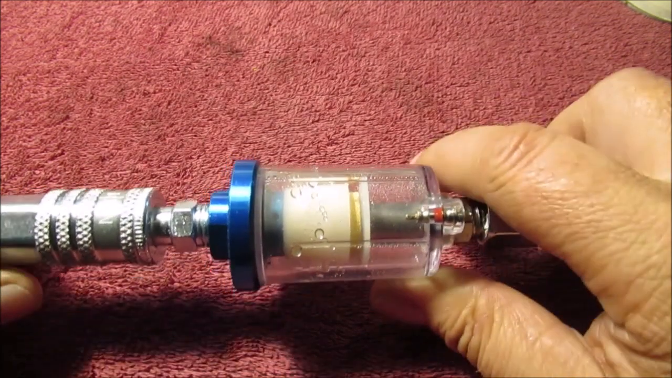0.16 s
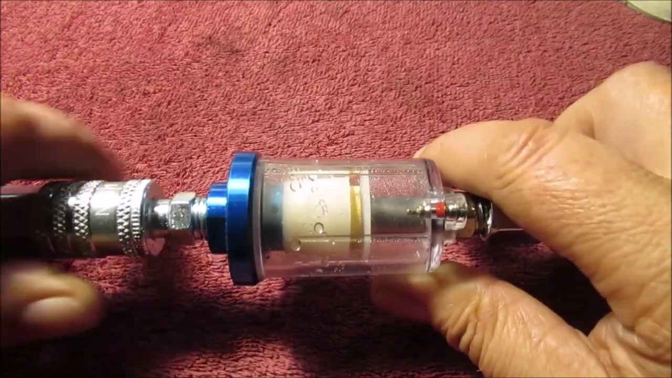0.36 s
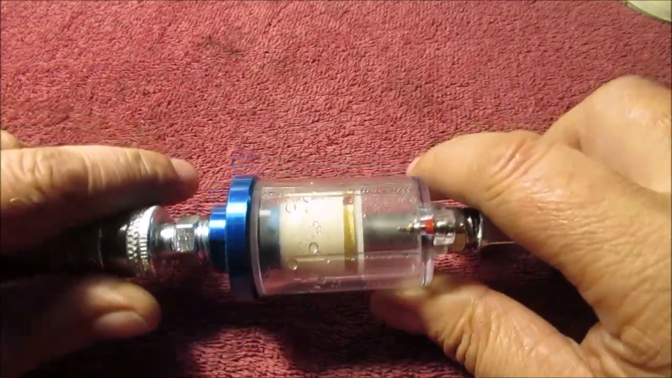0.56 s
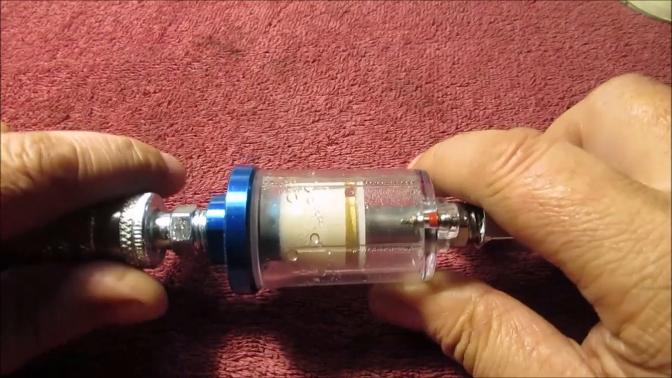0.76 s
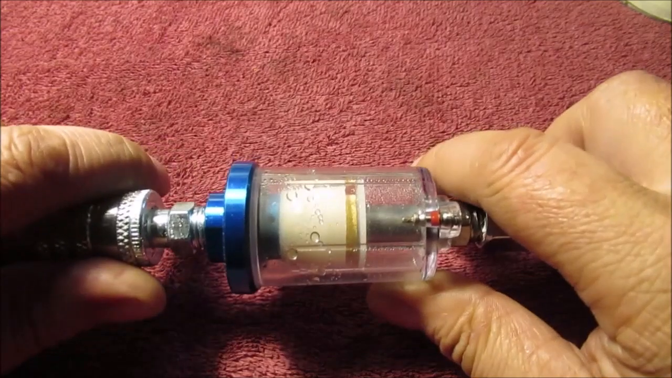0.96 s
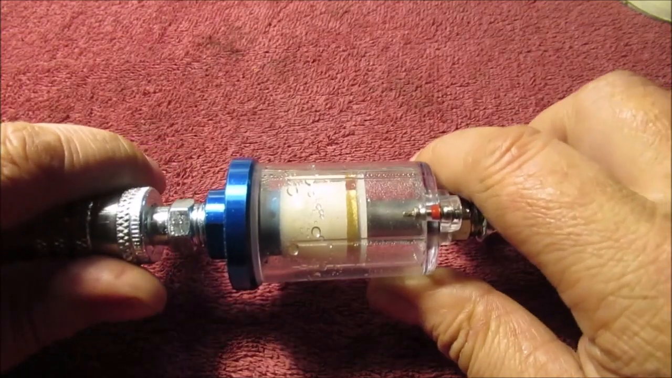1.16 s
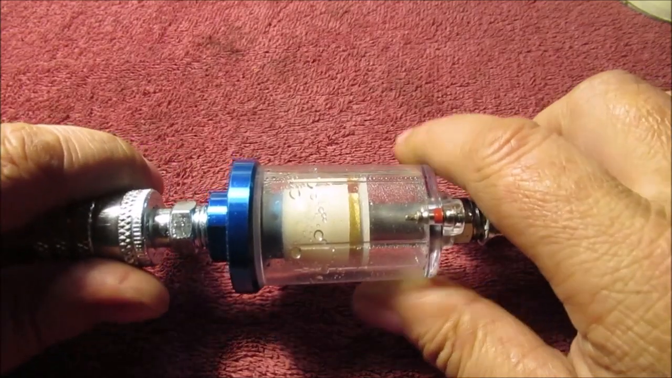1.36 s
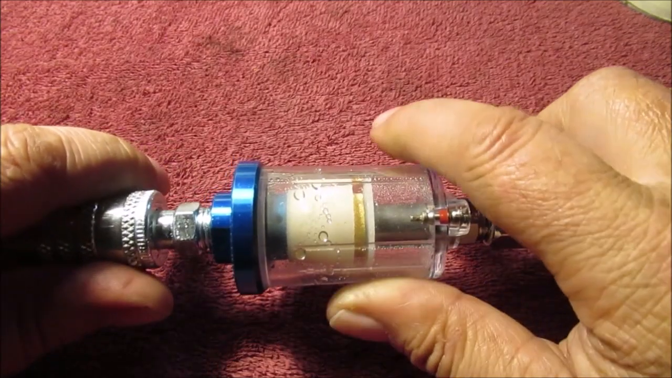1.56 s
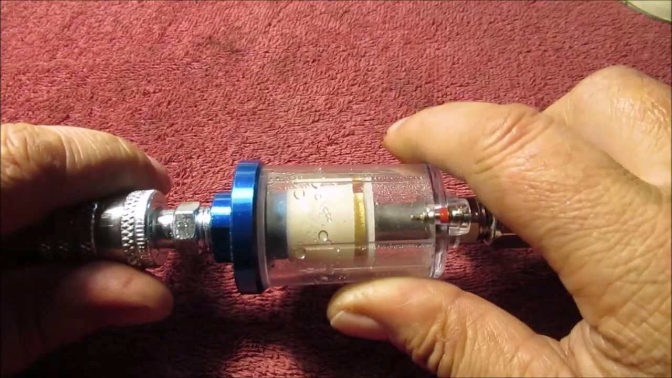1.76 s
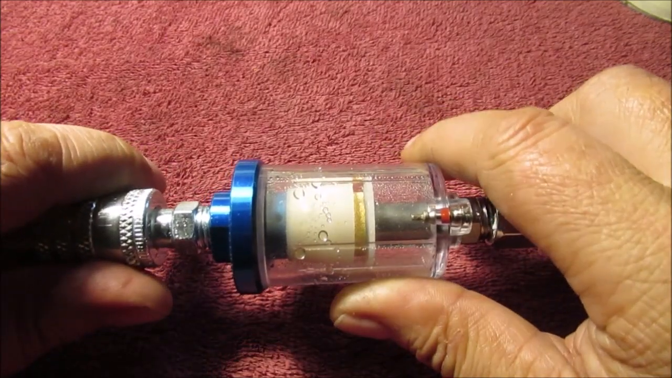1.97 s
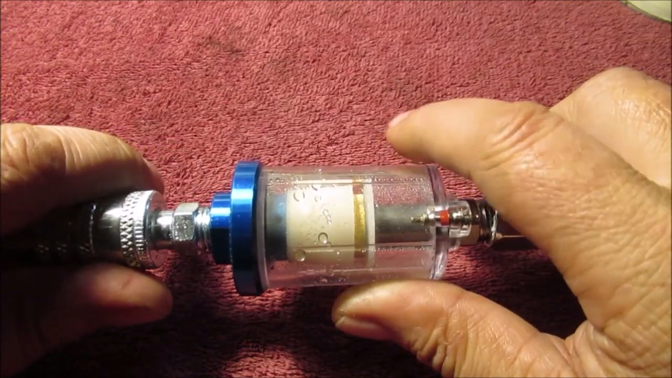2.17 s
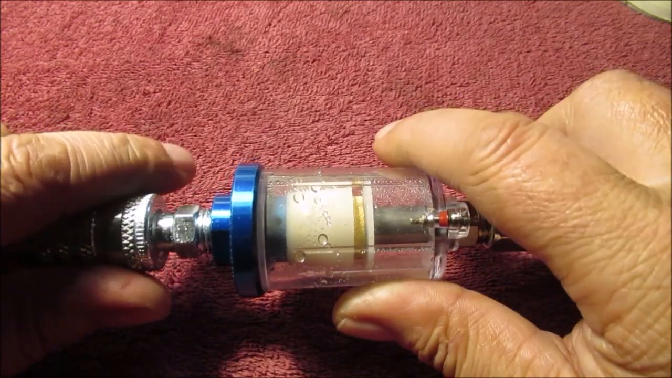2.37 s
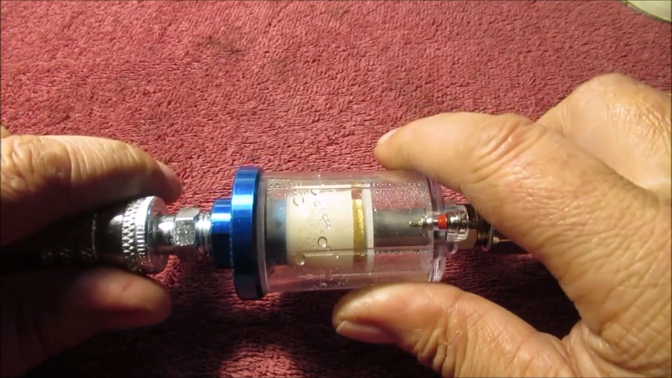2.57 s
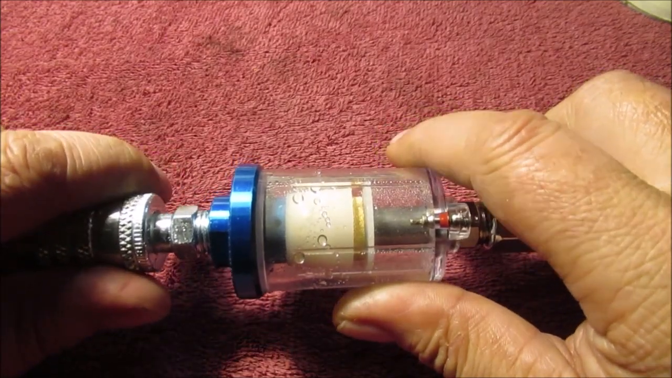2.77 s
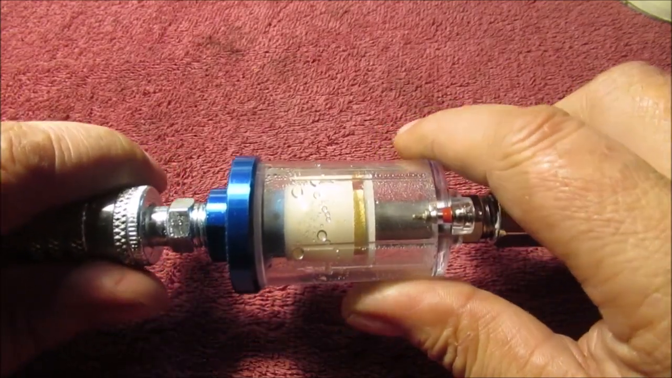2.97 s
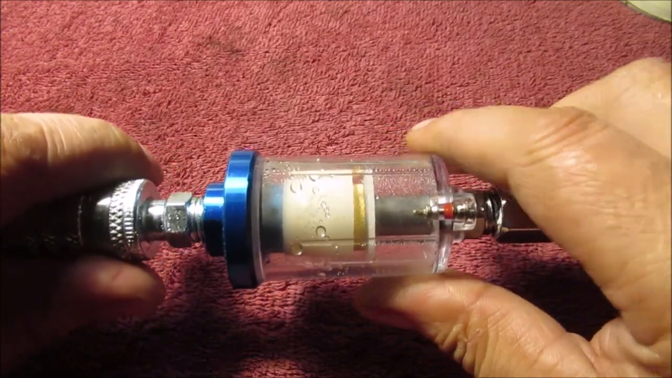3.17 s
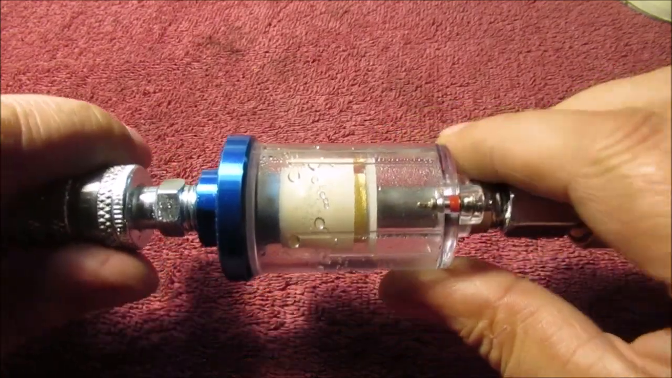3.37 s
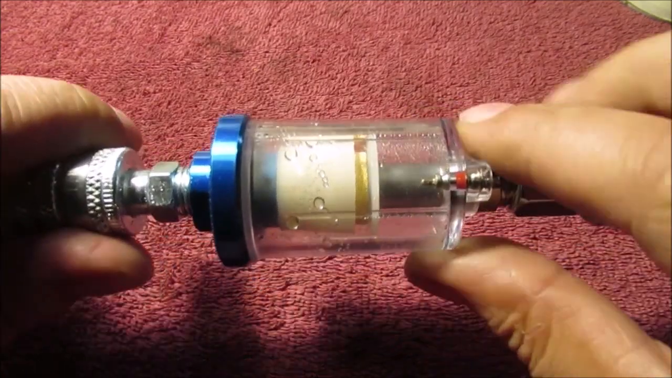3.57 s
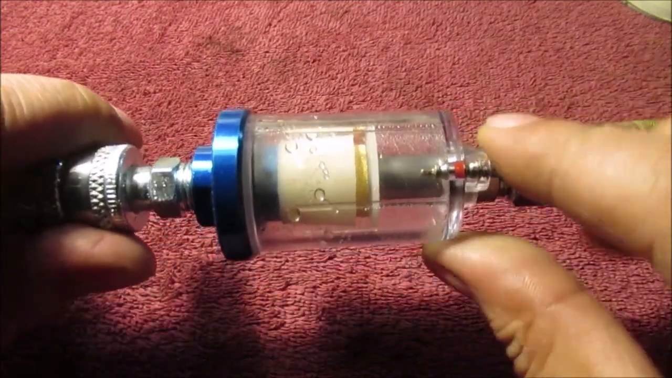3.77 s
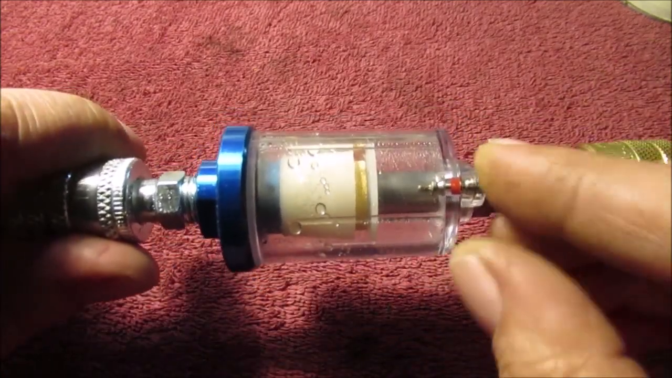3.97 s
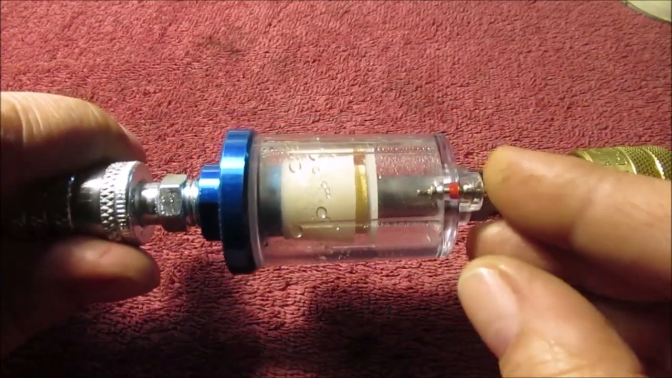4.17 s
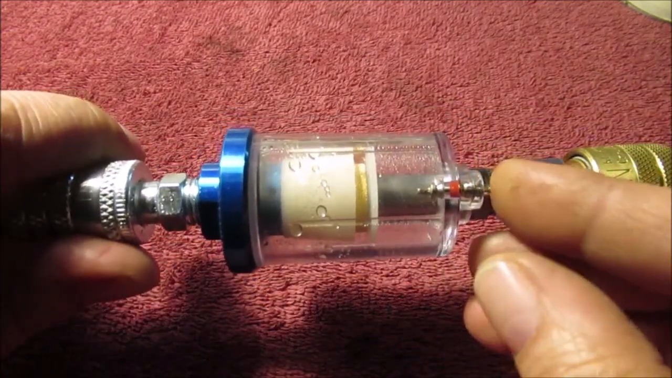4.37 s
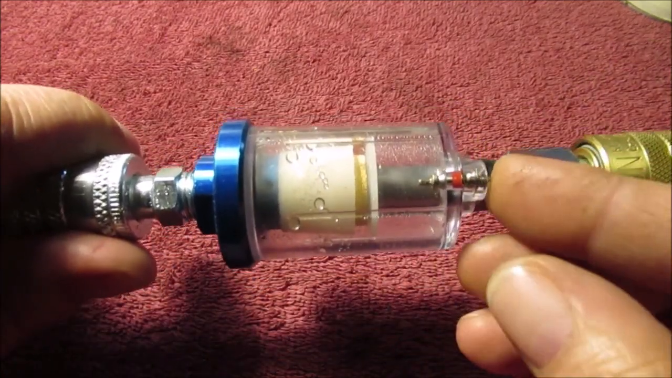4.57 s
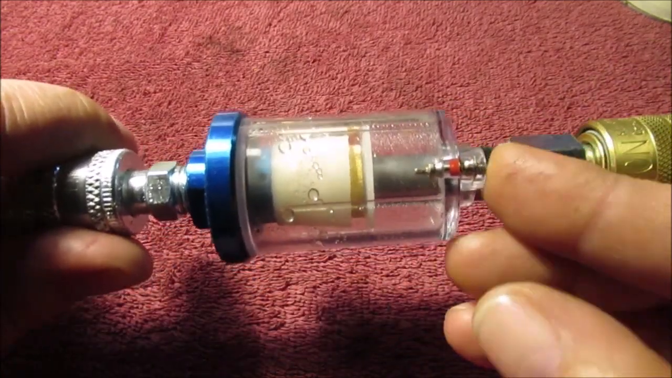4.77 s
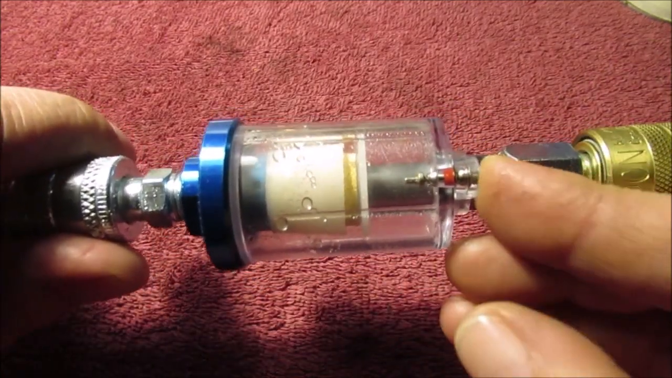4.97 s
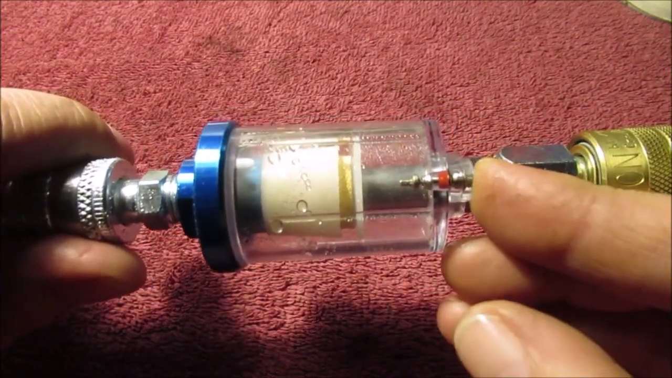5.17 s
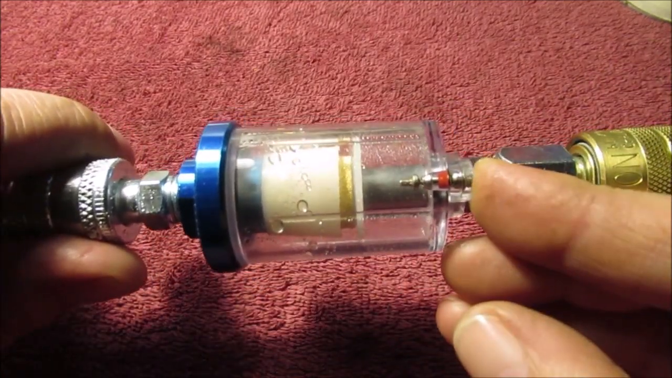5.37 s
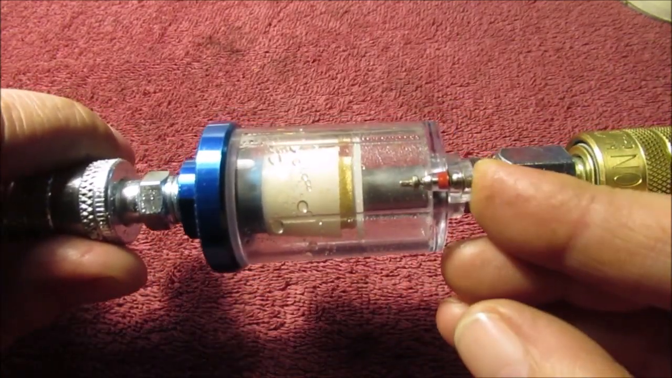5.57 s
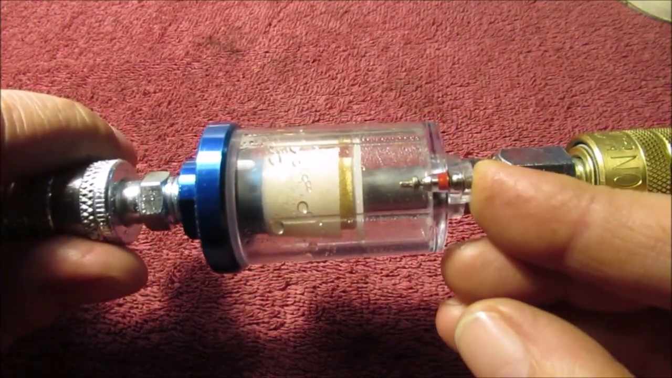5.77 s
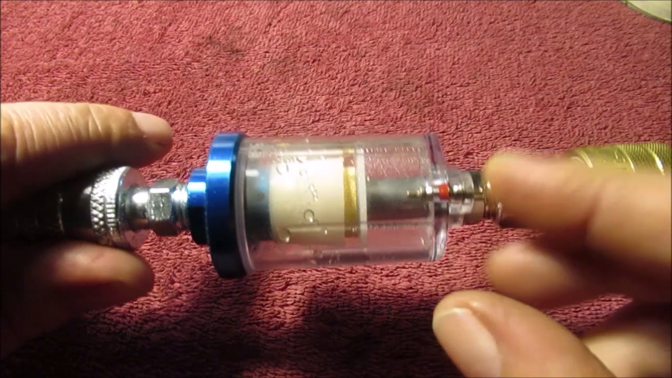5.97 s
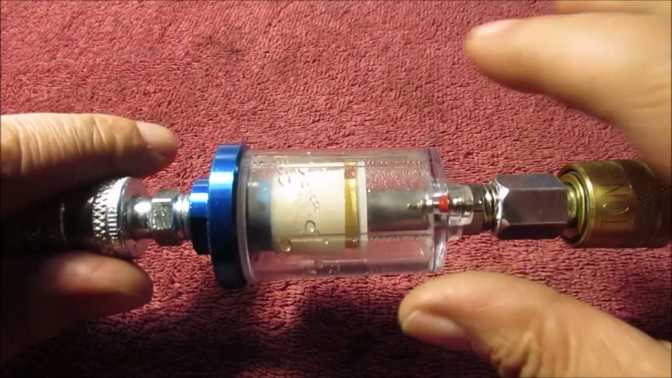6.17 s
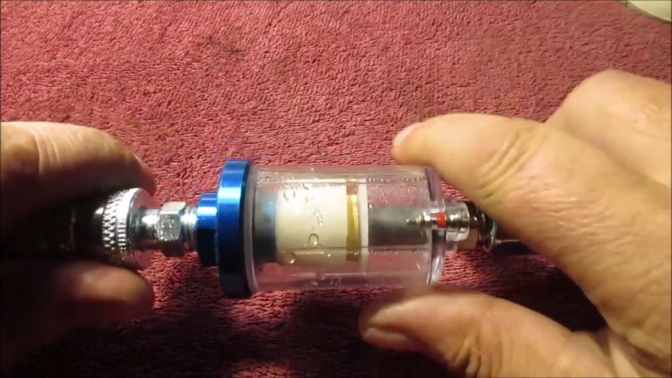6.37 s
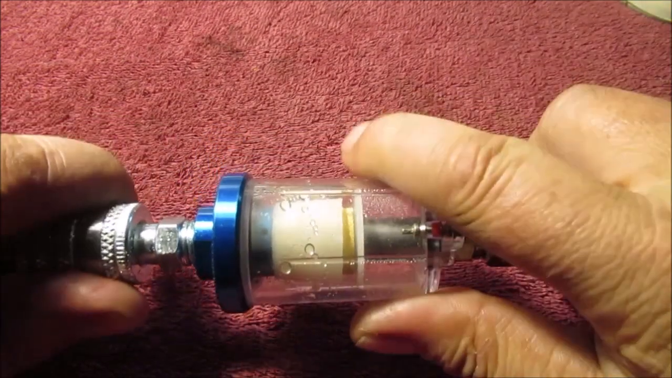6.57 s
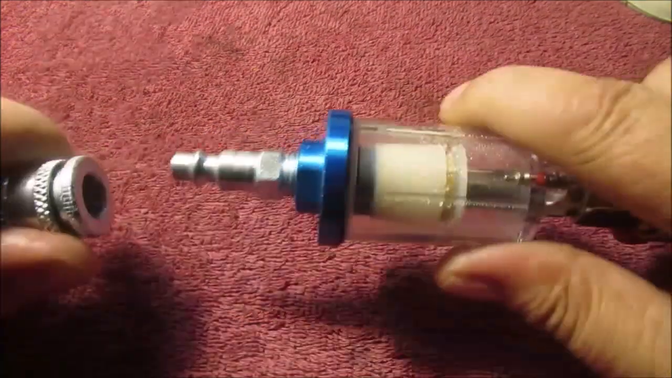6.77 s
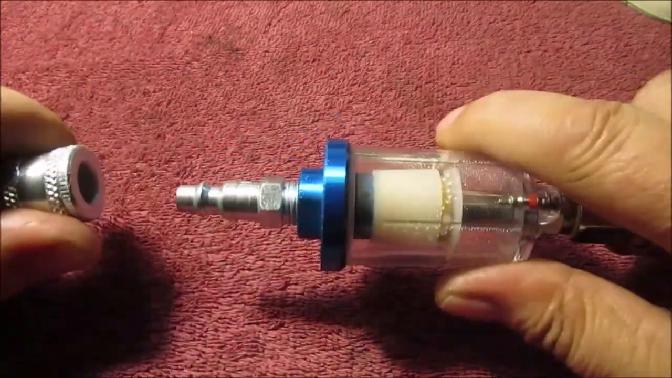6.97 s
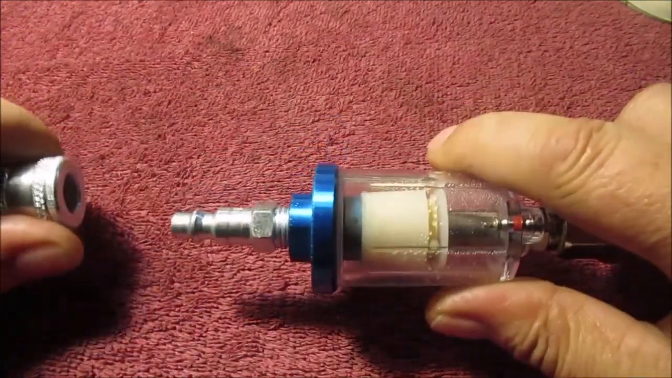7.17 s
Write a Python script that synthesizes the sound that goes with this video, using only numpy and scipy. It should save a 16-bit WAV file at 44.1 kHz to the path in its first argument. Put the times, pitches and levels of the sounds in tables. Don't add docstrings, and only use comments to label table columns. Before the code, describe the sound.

Close camera microphone in a workshop: a fast, throbbing compressor drone with metallic rattle, its tone wavering slightly and turning briefly hollow. A dull click opens a one-second roar of air, bright hiss over windy thumping, drowning the motor. It cuts off sharply; the drone returns faint and swells slowly. A harder knock releases another abrupt air blast, lasting to the end.

```python
import sys
import numpy as np
from scipy import signal
from scipy.fft import rfft, irfft, next_fast_len
from scipy.io import wavfile
from scipy.ndimage import uniform_filter1d

SR = 44100
rng = np.random.default_rng(int(sys.argv[2]) if len(sys.argv) > 2 else 0)


def attenuation_scalar(level_db):
    decades = np.asarray(level_db, float) / 20
    return 10 ** decades


def generate_wav(sig):
    pcm = np.round(np.clip(np.atleast_2d(sig).T, -1, 1) * 32767).astype(np.int16)
    wavfile.write(sys.argv[1], SR, pcm)


N = 318843
TIME = np.arange(N) / SR
SLOW = TIME[::100]

# (first leak [s], coupling open [s], shut [s], jet level [dB], buffeting level [dB])
BLASTS = [
    (4.961, 4.979, 6.015, -15.5, -25),
    (6.758, 6.77, 7.3, -17, -23),
]


def level(x, db):
    return x * attenuation_scalar(db) / np.sqrt(np.mean(x ** 2))


def ramp(start, length, time=TIME):
    return np.clip((time - start) / length, 0, 1)


def walk(rate, time=TIME):
    steps = np.repeat(rng.standard_normal(int(N * rate / SR) + 2), 8)
    slewed = uniform_filter1d(uniform_filter1d(steps, size=8), size=8)
    return 1.3 * np.interp(time, np.arange(len(steps)) / (8 * rate), slewed)


def noise(colour, rings=()):
    size = next_fast_len(N)
    hz = np.arange(1, size // 2 + 2) * SR / size
    colour_hz, colour_db = np.transpose(colour)
    db = np.interp(np.log(hz), np.log(colour_hz), colour_db)
    for ring_hz, width, ring_db in rings:
        db = db + ring_db / (1 + (2 * (hz - ring_hz) / width) ** 2)
    spectrum = rfft(rng.standard_normal(size)) * attenuation_scalar(db)
    return level(irfft(spectrum, size)[:N], 0)


def compressor():
    valves = [
        (19, .53),
        (35, .26),
    ]
    turn = 2 * np.pi * 57.779 * TIME
    order, stroke_db = stroke()
    phases = stroke_phases(order, stroke_db, valves)
    around = uniform_filter1d(stroke_db, size=7)
    shade = hands()
    shaft = np.exp(1j * turn)
    lines, multiple = 0, 1
    for k, db, start, around_db in zip(order, stroke_db, phases, around):
        multiple = multiple * shaft
        hand_gain = shade.get(k, 1)
        direct = attenuation_scalar(db) * hand_gain
        drift = np.minimum(hand_gain, 1) * attenuation_scalar(around_db - 16) * (walk(2.5, SLOW) + 1j * walk(2.5, SLOW))
        shiver = attenuation_scalar(db - 19) * (walk(30, SLOW) + 1j * walk(30, SLOW))
        envelope = np.interp(TIME, SLOW, (direct + drift + shiver) * np.exp(1j * start))
        lines = lines + np.real(envelope * multiple)
    machine = level(lines, 0) + clatter(turn) + valve_spit(turn, valves[1][1])
    return machine * attenuation_scalar(drone_db())


def stroke():
    # (multiple of the shaft rate [1], level [dB])
    strong_lines = [(1, -31), (2, -12), (3, -4), (4, -11), (5, -10), (6, -10), (7, -6), (8, -15), (9, -1),
                    (10, -11), (11, 0), (12, -23), (13, -16), (14, -9), (15, -16), (16, -3), (17, -11),
                    (18, -18), (20, -20), (21, -22), (22, -15), (24, -23), (25, -23), (26, -19), (28, -18),
                    (29, -20), (32, -22), (34, -19), (37, -23), (41, -22)]
    order = np.arange(60) + 1
    faint_db = -29 - 1.1 * np.clip(order - 46, 0, None) - 3.5 * np.cos(np.pi * order * 2 / 3)
    strong = dict(strong_lines)
    return order, np.array([strong.get(k, faint) for k, faint in zip(order, faint_db)])


def stroke_phases(order, stroke_db, valves):
    smear = (-.22, .792, -2.157)
    blur_rad = 1.1
    lag = np.polyval(smear, order)
    for first, share in valves:
        slap = blur_rad * rng.standard_normal(len(order)) - 2 * np.pi * share * order
        lag = np.where(order >= first, slap, lag)
    return causal_phase(stroke_db) + lag


def causal_phase(db):
    log = np.log(attenuation_scalar(np.concatenate([db[:1], db, db[-2::-1]])))
    fold = np.concatenate([[1], np.full(len(db) - 1, 2), [1], np.zeros(len(db) - 1)])
    folded = np.fft.ifft(log).real * fold
    return np.fft.fft(folded).imag[1:len(db) + 1]


def hands():
    # (multiple [1], from [s], to [s], level change [dB])
    hand_moves = [(5, .5, .8, -8), (5, 0, .95, -3), (5, 2.5, 4.4, -10.5), (5, 3.5, 5, -4.5),
                  (6, 0.5, .45, -8), (6, 1.2, 1.55, -11), (6, 1.4, 1.4, -11), (6, 2.5, 2.5, -14),
                  (6, 4.5, 7.3, -4), (6, 4.8, 7.3, -9), (7, 1.1, 2.1, 3.5), (7, 5.5, 7.3, 3)]
    half_s = 0.075
    db = {}
    for k, start, end, change_db in hand_moves:
        held = ramp(start - half_s, 2 * half_s, SLOW) - ramp(end - half_s, 2 * half_s, SLOW)
        db[k] = db.get(k, 0) + change_db * held
    before = SLOW < BLASTS[0][0]
    return {k: attenuation_scalar(v) / np.sqrt(np.mean(attenuation_scalar(2 * v[before]))) for k, v in db.items()}


def clatter(turn):
    # (frequency [Hz], density [dB per Hz])
    clatter_colour = [(24, -70.5), (40, -64.5), (166, -7.5), (280, -7.5), (407, -3.5), (461, -13),
                      (509, -4.5), (637, -5.5), (704, -10.5), (926, -4.5), (1100, -13.5), (1640, -15),
                      (3650, -21), (13700, -31.5), (15500, -36.5)]
    # (frequency [Hz], width [Hz], level [dB])
    casing = [(2411, 140, 4), (3310, 56, 3.5), (4330, 95, 5.5), (4700, 150, 5), (5660, 93, 5),
              (6890, 200, 4), (8270, 250, 4), (13900, 300, 4)]
    gate = attenuation_scalar(0.89 * np.cos(turn - 2.5) + 0.62 * walk(12))
    return attenuation_scalar(-12) * gate * noise(clatter_colour, casing)


def valve_spit(turn, share):
    # (frequency [Hz], width [Hz], level [dB])
    spit_ring = [
        (2760, 700, 25),
    ]
    gate = attenuation_scalar(4 * np.cos(turn - 2 * np.pi * share))
    return attenuation_scalar(-31.5) * gate * noise([(1, 0), (SR, 0)], spit_ring)


def drone_db():
    # (time [s], depth [dB])
    pulls = [
        (0, 2),
        (.6, 0),
        (.8, 2),
        (1.4, 1.44),
        (2.03, 2),
        (3.22, 2),
        (4.7, 1.2),
        (6.03, 13),
    ]
    ducked = [-35, -50]
    rest_db, creep_db_per_s = -14, 5
    pull_s, duck_s = 0.011, 0.02
    db = rest_db
    for s, depth_db in pulls:
        recovering_db = np.clip(depth_db - creep_db_per_s * (TIME - s), 0, depth_db)
        db = db - recovering_db * ramp(s - pull_s, pull_s)
    for (_, opened, shut, _, _), ducked_db in zip(BLASTS, ducked):
        under = ramp(opened, duck_s) - ramp(shut, duck_s)
        db = db + under * (ducked_db - db)
    return db


def air():
    # (frequency [Hz], density [dB per Hz])
    jet_colour = [(470, -41), (800, -10.5), (841, 1), (917, -7), (988, -4.5), (1910, -2), (2660, -3),
                  (9210, -2), (14400, -2.5), (15500, -6)]
    # (frequency [Hz], density [dB per Hz])
    buffet_colour = [(40, -32), (90, -9.5), (160, -3.5), (400, -1), (900, -1.5), (1800, -5.5),
                     (3500, -10.5), (8000, -50)]
    # (frequency [Hz], density [dB per Hz])
    rumble_colour = [(20, -23), (50, -6), (120, -3), (250, -7), (500, -30)]
    rumble_levels = [-11, -24]
    leak_levels = [-16.5, -7]
    # (time [s], jet change [dB], buffeting change [dB])
    swings = [
        (5.85, 0, 2),
        (6.94, 3, 2),
        (7.05, 0, 3),
        (7.18, -1, -3),
    ]
    swing_s = .03
    jet = noise(jet_colour) * attenuation_scalar(1.34 * walk(25))
    buffet = noise(buffet_colour) * attenuation_scalar(1.2 * walk(30) + 2 * walk(250))
    rumble = noise(rumble_colour) * attenuation_scalar(3.4 * walk(14))
    out = 0
    for blast, leak_db, rumble_db in zip(BLASTS, leak_levels, rumble_levels):
        leak, opened, shut, jet_db, buffet_db = blast
        for s, jet_change_db, buffet_change_db in swings:
            if s > leak:
                swung = ramp(s - swing_s, 2 * swing_s)
                jet_db = jet_db + jet_change_db * swung
                buffet_db = buffet_db + buffet_change_db * swung
        low = buffet + attenuation_scalar(rumble_db) * rumble
        stream = jet * attenuation_scalar(jet_db) + low * attenuation_scalar(buffet_db)
        out = out + stream * attenuation_scalar(flow_db(leak, opened, shut, leak_db))
    return out


def flow_db(leak, opened, shut, leak_db):
    open_s, shut_s = 0.0048, .01
    burst_db, burst_s = 4.5, 0.014
    sag_db_per_s, tail_db_per_s = 1.5, 300
    since = np.clip(TIME - opened, 0, None)
    rise = -40 * (1 - ramp(leak - open_s, open_s)) + leak_db * (1 - ramp(opened - open_s, open_s))
    burst = (TIME > opened - open_s) * burst_db * np.exp(-since / burst_s)
    hold = burst - sag_db_per_s * since
    fall = -12.5 * ramp(shut, shut_s) - tail_db_per_s * np.clip(TIME - shut - shut_s, 0, 1)
    return np.where(TIME < leak - open_s, -200, rise + hold + fall)


def coupling():
    # (time [s], signed peak [1], frequency [Hz], decay by 60 dB [s])
    knocks = [
        (4.9725, .5, 500, .006),
        (4.9885, -.6, 600, .006),
        (5.1985, -.35, 700, .005),
        (5.5415, -.35, 700, .005),
        (5.9445, -.3, 500, .005),
        (5.9911, -.65, 600, .008),
        (6.7682, -.4, 500, .006),
        (6.7710, -.9, 900, .006),
    ]
    out = np.zeros(N)
    for s, peak, hz, t60 in knocks:
        t = np.clip(TIME - s, 0, None)
        tick = .5 * np.sin(2 * np.pi * 2.8 * hz * t)
        ring = np.sin(2 * np.pi * hz * t) + tick
        out += peak * attenuation_scalar(-60 * t / t60) * ring
    return out


def scene():
    mono = compressor() + air() + coupling()
    return np.array([mono, mono])


def starve(x):
    # (middle of the first [s], length [frames])
    starved = [
        [(.564, 1), (1.033, 1), (1.161, 1), (1.439, 1), (1.524, 3), (1.759, 2), (1.865, 1), (2.015, 1),
         (2.42, 2), (2.569, 1), (2.633, 1), (2.996, 2), (3.06, 1), (4.255, 1), (4.361, 1), (4.532, 1),
         (4.639, 1)],
        [(4.98, 1)],
        [(5.151, 1), (5.279, 2), (5.385, 2), (5.471, 1), (5.577, 2), (5.663, 1), (6.815, 1), (6.857, 1),
         (6.921, 1)],
        [(6.089, 1), (6.345, 1)],
    ]
    # (offset [dB], ceiling [dB])
    step_levels = [
        (5, -5),
        (7, 3),
        (9.5, 3),
        (-2, -18),
    ]
    # (time [s], half width [s], level [dB])
    short_gap = (7.01, .003, -13)
    hop, grid, rate = 1024, 445, 48000
    fast = signal.resample_poly(x, 160, 147)
    n, k = np.arange(2 * hop) + .5, np.arange(hop) + .5
    window = np.sin(np.pi * n / (2 * hop))[:, None]
    basis = window * np.cos(np.pi / hop * np.outer(n + hop / 2, k)) * np.sqrt(2 / hop)
    bass_spared_db = 3.5 * np.exp(-k / 60)
    lost = np.zeros(len(fast))
    for times, (offset_db, ceiling_db) in zip(starved, step_levels):
        reach = np.exp(-((n - hop) / (rate * .01)) ** 6) if times is starved[1] else 1
        for s in [first + i * hop / rate for first, count in times for i in range(count)]:
            at = grid + hop * (round((s * rate - grid) / hop) - 1)
            lines = fast[at:at + 2 * hop] @ basis
            local_db = 10 * np.log10(uniform_filter1d(lines ** 2, size=40) + 1e-9)
            band_db = 1.5 * np.repeat(rng.standard_normal(hop // 16), 16)
            step_db = np.minimum(offset_db + .6 * local_db, ceiling_db)
            step = attenuation_scalar(step_db + band_db - bass_spared_db)
            rounded = np.floor((np.abs(lines) / step) ** .75 + .4054) ** (4 / 3)
            kept = np.sign(lines) * step * rounded
            lost[at:at + 2 * hop] += reach * (basis @ (lines - kept))
    gap_s, half_s, gap_db = short_gap
    gap = attenuation_scalar(gap_db * np.exp(-((TIME - gap_s) / half_s) ** 2))
    return signal.resample_poly(fast - lost, 147, 160)[:N] * gap


def split():
    # (time [s], low edge [Hz], high edge [Hz], side level [dB])
    splits = [
        (5.327, 4000, 5300, -31),
        (5.768, 11000, 13400, -27),
        (5.79, 10800, 12500, -29),
        (5.79, 14200, 15400, -34),
        (6.838, 4800, 6500, -28),
        (6.838, 11500, 15300, -29),
    ]
    side = 0
    for s, low_hz, high_hz, db in splits:
        band = noise([(low_hz - 50, -80), (low_hz, 0), (high_hz, 0), (high_hz + 50, -80)])
        side = side + attenuation_scalar(db) * band * np.exp(-((TIME - s) / .011) ** 2)
    return side


def low_pass(x):
    return signal.sosfilt(signal.butter(12, 16190, fs=SR, output="sos"), x)


def record(dry):
    mono = np.tanh(1.138 * dry[0]) / 1.063
    band_edge = signal.ellip(8, .2, 50, 15000, fs=SR, output="sos")
    mono = starve(signal.sosfilt(band_edge, mono))
    side = split()
    return low_pass(np.array([mono + side, mono - side]))


dry = scene()
out = record(dry)
generate_wav(out)
```